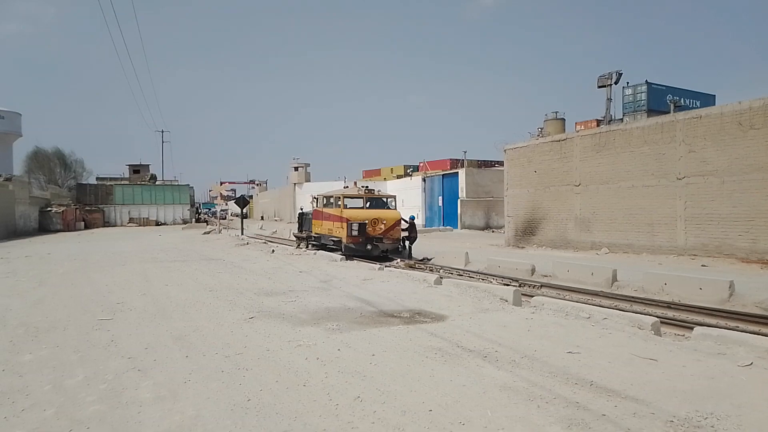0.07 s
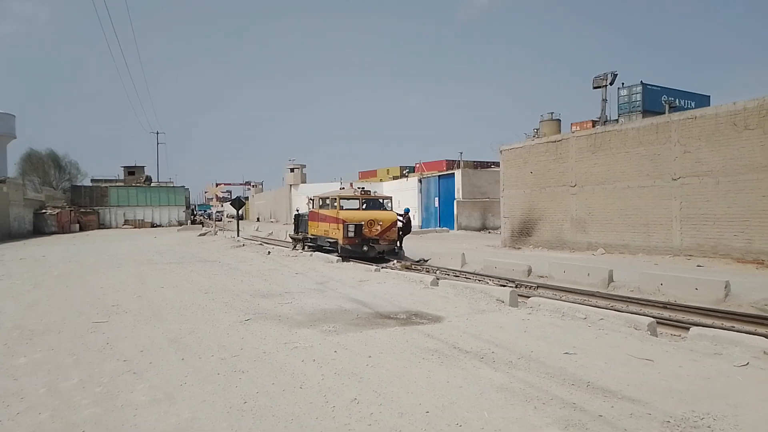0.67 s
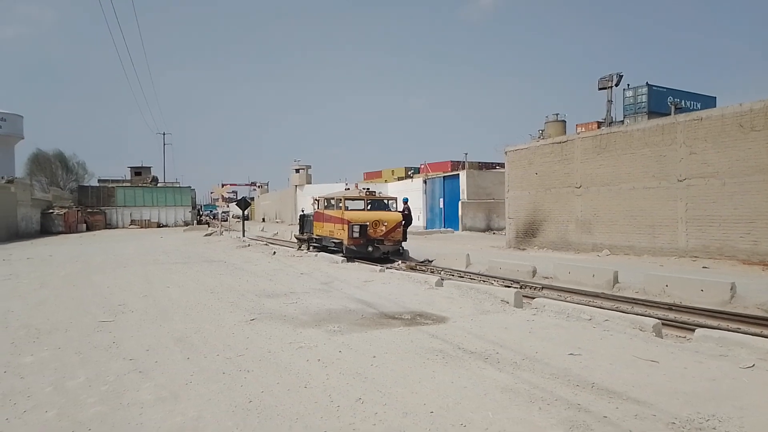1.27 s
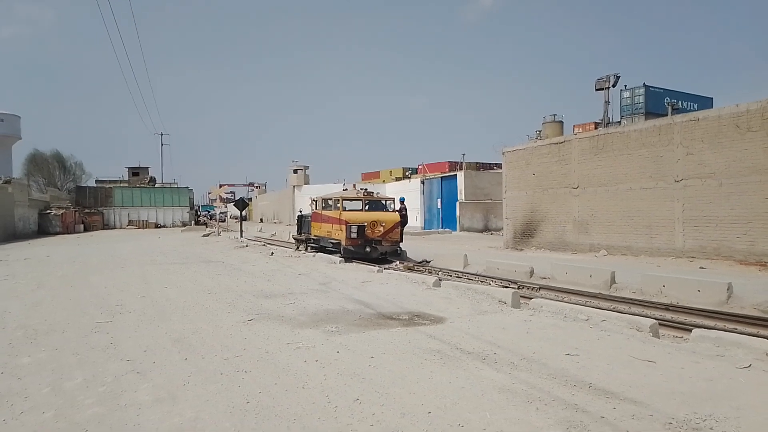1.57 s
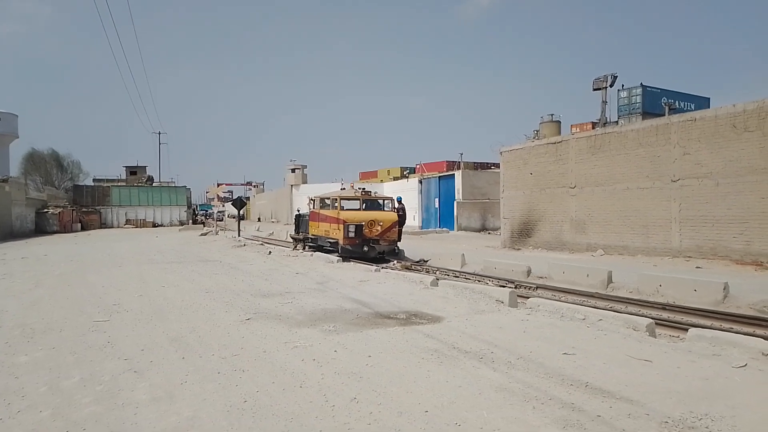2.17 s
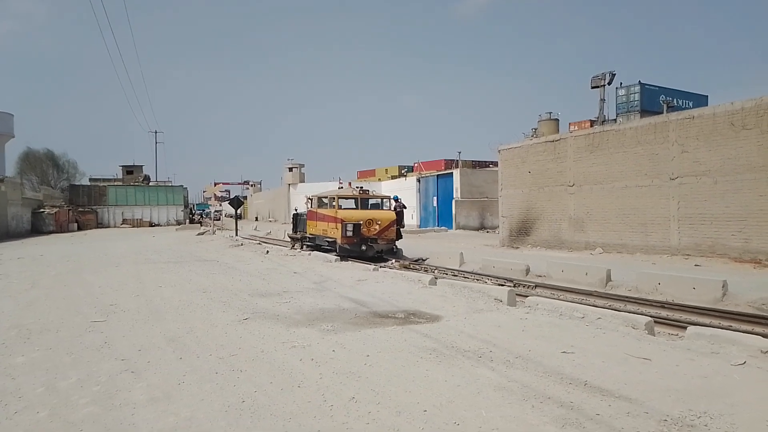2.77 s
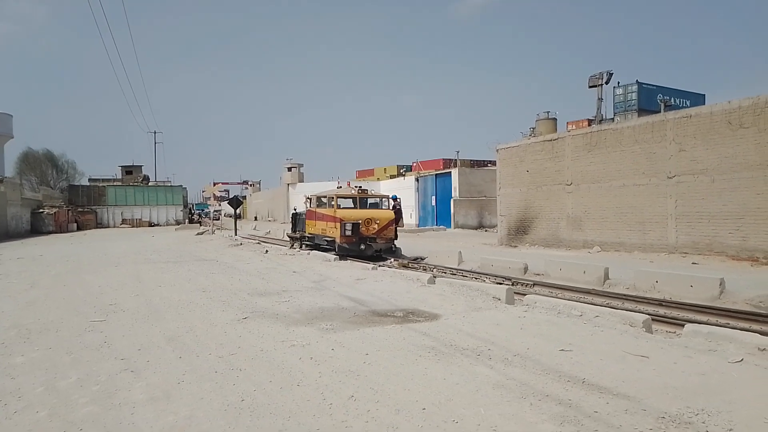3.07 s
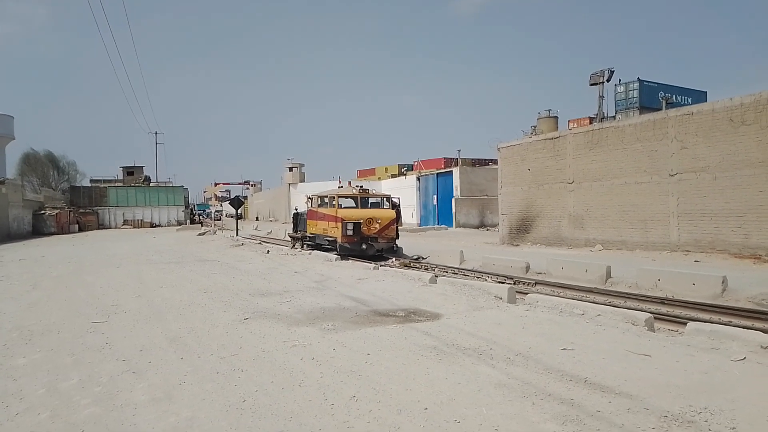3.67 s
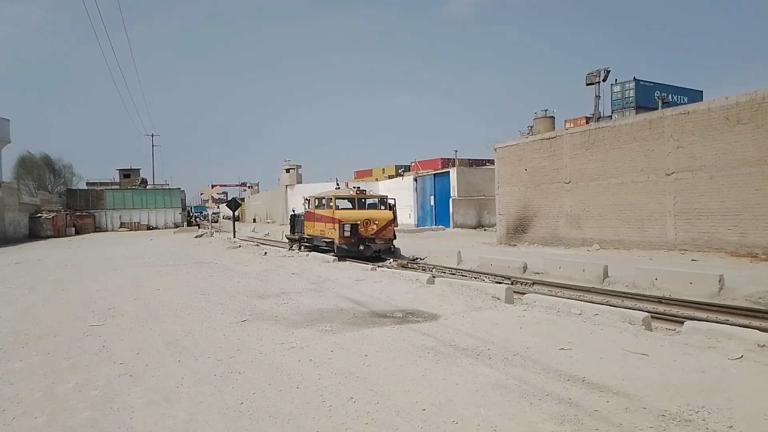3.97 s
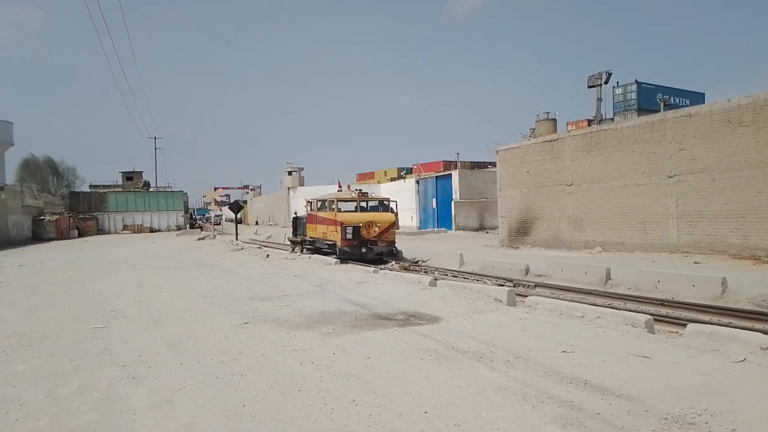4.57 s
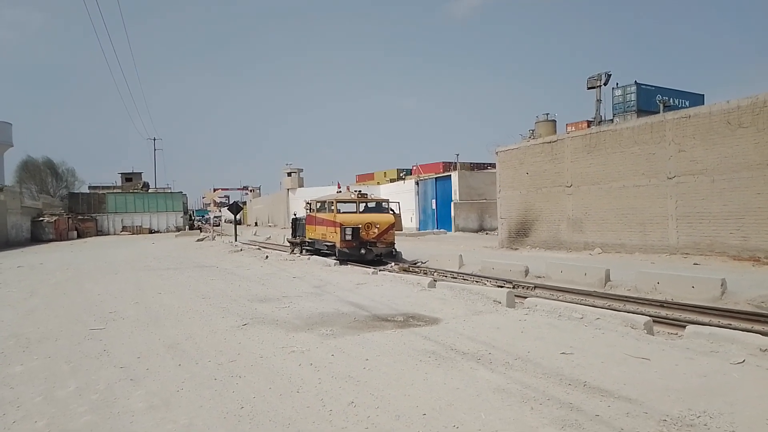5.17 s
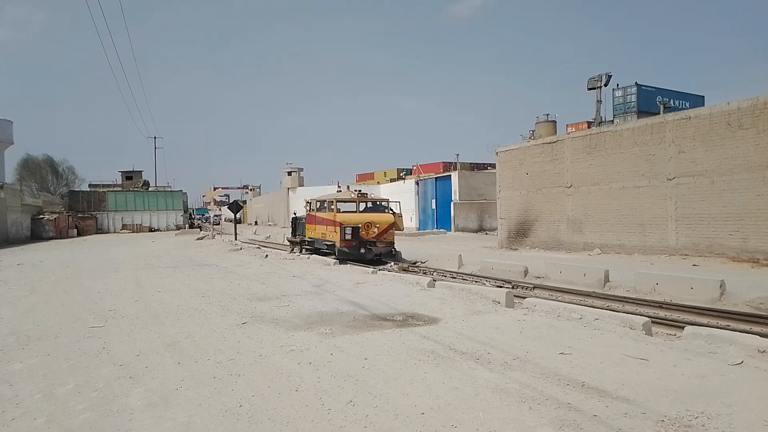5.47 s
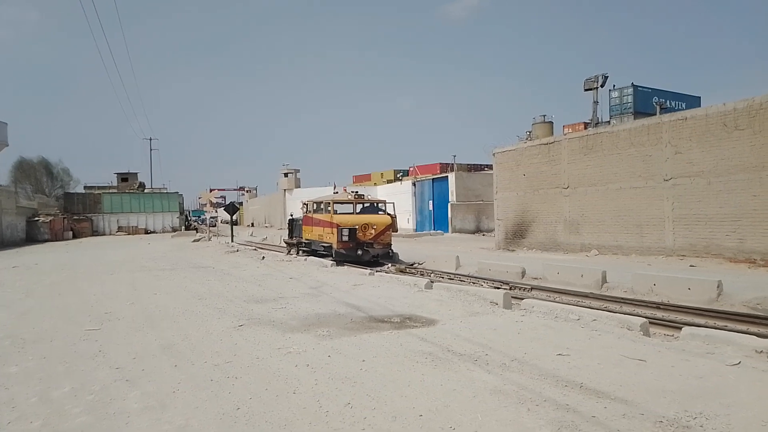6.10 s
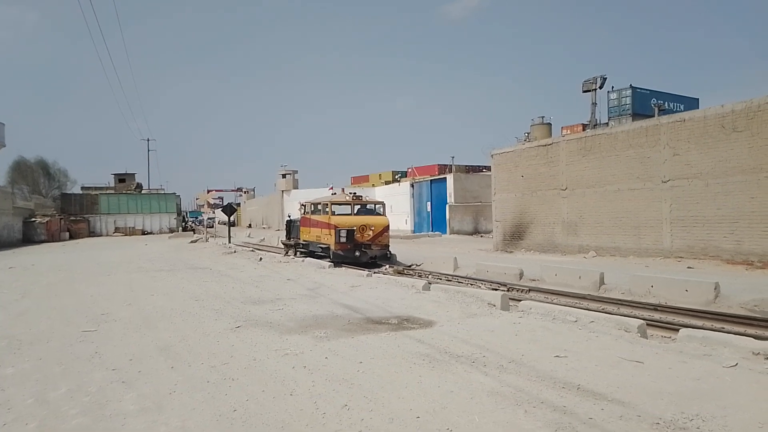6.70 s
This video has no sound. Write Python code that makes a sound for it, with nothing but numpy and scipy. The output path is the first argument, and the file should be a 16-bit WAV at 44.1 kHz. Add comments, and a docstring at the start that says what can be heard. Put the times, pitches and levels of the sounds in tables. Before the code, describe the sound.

A small rail trolley creeps along a yard track at a distance, its diesel idling low and steady beneath gusts of wind that buffet the microphone. Three short bursts of metal come in turn: a ringing coupling with a squeak, a light chain jingle, then knocking brake parts and squeaking wheels. Soft hollow drones, gritty ticks and faint chirps come and go, and the wind drops at the end.

```python
"""Wind rumbles in gusts on the microphone while a diesel ticks over some way off.
The engine belongs to a small rail trolley creeping along a yard track. Impacts set its coupling,
chain and brake rigging ringing, and low, hollow drones swell and fade along with the clanks.
Friction makes the wheels squeak, among ticks of grit and faint chirps. Most of the low rumble
is the fluctuating pressure of turbulent eddies."""
import sys
import numpy as np
from scipy import signal
from scipy.fft import rfft, irfft, next_fast_len
from scipy.io import wavfile
from scipy.ndimage import uniform_filter1d, map_coordinates

SR = 44100
rng = np.random.default_rng(int(sys.argv[2]) if len(sys.argv) > 2 else 0)


def wav_record(signal):
    """Record a signal, one row per channel, as 16-bit PCM in the file named by sys.argv[1]."""
    frames = np.transpose(np.atleast_2d(signal))
    bounded = np.clip(frames, -1, 1)
    # unit amplitude maps onto the largest positive 16-bit level
    quanta = np.round(bounded * 32767).astype(np.int16)
    wavfile.write(sys.argv[1], SR, quanta)


N = 306054


def amp(db):
    """Decibels to amplitude ratio."""
    return 10 ** (np.asarray(db) / 20)


def unit(x):
    """Normalisation to rms 1."""
    return x / np.sqrt(np.mean(x ** 2) + 1e-20)


def clock():
    """Sample times, t/s."""
    return np.arange(N) / SR


def wobble(rate):
    """Smooth random modulation: a spline through rate knots a second."""
    return map_coordinates(rng.standard_normal(int(N * rate / SR) + 4), [clock() * rate])


def filtered(x, response):
    """Linear filtering: the spectrum of x times a frequency response."""
    m = next_fast_len(N + SR // 4)
    return irfft(rfft(x, m) * response(np.fft.rfftfreq(m, 1 / SR)), m)[:N]


def noise(spectrum, drive=1):
    """Source and filter: noise under an envelope, coloured by (f/Hz, level/dB) points; rms 1."""
    f, db = np.transpose(spectrum)
    source = drive * rng.standard_normal(N)
    return unit(filtered(source, lambda hz: amp(np.interp(np.log(hz + 1), np.log(f), db))))


def resonance(centre_hz, width):
    """Random excitation of a cluster of close modes gives narrow-band noise; rms 1."""
    m = next_fast_len(N, real=True)
    detuning = (np.fft.rfftfreq(m, 1 / SR) - centre_hz) / (1.29 * width)
    drive = rng.standard_normal(len(detuning)) + 1j * rng.standard_normal(len(detuning))
    return unit(irfft(drive / (1 + detuning ** 2) ** 2, m)[:N])


def bank(modes):
    """Superposition of resonances (f/Hz, width/Hz, level/dB)."""
    return sum(amp(db) * resonance(hz, width) for hz, width, db in modes)


def even(x, seconds):
    """Division by the running rms removes slow swells."""
    return x / np.sqrt(np.abs(uniform_filter1d(x ** 2, int(seconds * SR))) + 1e-9)


def held(start, length, attack, t60):
    """Linear rise, hold until start + length, then exponential decay; times in s."""
    t = clock() - start
    return np.clip(t / attack, 0, 1) * amp(-60 * np.maximum(t - length, 0) / t60)


def decays(hits, t60):
    """Envelope of incoherent blows (t/s, level/dB): energies add and fall 60 dB in t60 seconds."""
    s, db = np.transpose(hits)
    energy = np.bincount(np.round(s * SR).astype(int), amp(db) ** 2, N)[:N]
    retained = amp(-60 / (t60 * SR)) ** 2
    return np.sqrt(signal.lfilter([1], [1, -retained], energy) + 1e-20)


def engine():
    """Periodic excitation: each firing pushes the exhaust and sets off a burst of clatter."""
    # exhaust harmonics: multiple of the firing rate, level/dB
    harmonics = [(3, -55), (4, -50.5), (5, -54.5), (6, -59)]
    # spectra of exhaust roughness and engine clatter: f/Hz, relative level/dB
    rumble_spectrum = [(20, -25.5), (45, 1.5), (75, 7), (140, 5.5), (220, -13.5), (300, -42), (800, -120)]
    clatter_spectrum = [(590, -26), (1000, -2.5), (1300, -4), (1900, -0.5), (2700, -3.5), (3300, -10),
                        (4200, -16.5), (5500, -18), (7200, -18.5), (8700, -22.5), (10200, -16.5),
                        (11200, -23), (12800, -28), (15500, -40.5)]
    # engine bay resonances: f/Hz, width/Hz, relative level/dB
    bay_modes = [(428.4, 68, -0.5), (648, 110, -5.5), (878, 77, -7.5), (1127, 41, -10), (1400, 74, -23),
                 (1586, 46, -11)]
    firing_hz = 27.35
    cycles = np.cumsum(firing_hz * (1 + 0.0044 * wobble(3))) / SR
    pipe = 0
    for k, db in harmonics:
        pipe += amp(db + 1 + 2.5 * wobble(17)) * np.sin(2 * np.pi * (k * cycles + rng.random()))
    throb = unit(1 + 1.2 * np.exp(-(cycles % 1) / 0.91))
    drift = amp(.5 * wobble(7))
    clatter = amp(-66) * drift * throb * noise(clatter_spectrum)
    bay = amp(-68.5) * throb * unit(bank(bay_modes))
    rumble = amp(-52.5) * noise(rumble_spectrum, throb)
    return pipe + rumble + clatter + bay


def whine():
    """Narrow resonances: engine accessories whine thinly; a louder tone fades in the first second."""
    # accessory tones: f/Hz, width/Hz, level/dB
    tones = [(904, 9.1, -83), (955, 5, -80), (1174, 18, -85.5), (1390, 26, -80.5)]
    fade_db = np.interp(clock(), [0, .5, 1, 1.06], [-70.5, -76.5, -98, -120])
    fading = amp(fade_db) * even(resonance(1146, 1.6), 0.07)
    return bank(tones) + fading


def wind():
    """Turbulence at the microphone: large eddies rumble; stronger wind sheds small, fast ones."""
    # unceasing breeze: t/s, level/dB
    breeze = [(0.0, -38.5), (0.48, -47), (1.41, -41.5), (1.59, -35), (2.3, -39.5), (2.95, -40),
              (3.02, -48.5), (3.56, -34.5), (4.53, -37), (4.86, -42), (5.44, -42.5), (5.65, -49),
              (5.71, -37), (6.3, -45.5), (6.33, -56), (6.94, -53.5)]
    # gusts on top of it: t/s, length/s, large-eddy level/dB, small-eddy level/dB
    gusts = [(0.11, 0.19, -34, -48.5), (0.623, 0.16, -35, -50), (0.83, 0.093, -38.5, -49.5),
             (0.968, 0.064, -29, -42.5), (1.072, 0.26, -30, -36), (1.111, 0.017, -29, -28.5),
             (1.267, 0.014, -20.5, -25), (1.45, 0.093, -28.5, -34.5), (1.507, 0.018, -43, -31),
             (1.603, 0.041, -44, -36), (1.75, 0.28, -33.5, -40), (2.117, 0.1, -33, -52.5),
             (2.476, 0.22, -34, -59.5), (2.797, 0.028, -30, -56.5), (3.25, 0.09, -33.5, -54.5),
             (3.413, 0.016, -33.5, -40), (3.575, 0.318, -31, -38.5), (3.908, 0.057, -31.5, -40),
             (4.015, 0.049, -30, -35), (4.181, 0.073, -32.5, -47.5), (4.308, 0.19, -44, -52),
             (4.934, 0.067, -33.5, -53.5), (5.035, 0.25, -38.5, -67), (5.743, 0.057, -29.0, -47.5),
             (5.783, 0.31, -64, -51)]
    # pressure spectra of large and small eddies: f/Hz, relative level/dB
    large_spectrum = [(20, -36.5), (32, -30), (45, -18), (80, -5), (120, 1.5), (180, -1.5), (235, -10),
                      (290, -21.5), (380, -56), (700, -92)]
    small_spectrum = [(120, -45), (200, 5), (260, 8.5), (360, -1), (450, -14), (560, -20.5), (750, -54),
                      (1200, -82)]
    breeze_db = np.interp(clock(), *np.transpose(breeze))
    small_growth = 4.66  # dB per dB of breeze
    large_power = amp(breeze_db) ** 2
    small_power = amp(-78.5 + small_growth * (breeze_db - breeze_db.mean())) ** 2
    for start, length, large_db, small_db in gusts:
        gust = held(start, length, attack=0.0093, t60=0.19)
        large_power += (amp(large_db) * gust) ** 2
        small_power += (amp(small_db) * gust) ** 2
    lumps = amp(2.42 * wobble(70))
    rumble = np.sqrt(large_power) * even(noise(large_spectrum, lumps), 0.058)
    rumble = filtered(rumble, lambda hz: 1 / (1 + (hz / 275) ** 14))  # large eddies hold nothing faster
    small_eddies = even(noise(small_spectrum, lumps * amp(3.8 * wobble(30))), 0.064)
    flutter = amp(1.5) * np.sqrt(small_power) * small_eddies
    # only the hardest buffets tear off the tiniest eddies
    tearing = small_power / (small_power + amp(-35) ** 2)
    tiny_eddies = unit(amp(3.1 * wobble(120))) * resonance(457, 180)
    return rumble + flutter + amp(-10) * tearing * np.sqrt(small_power) * tiny_eddies


def thumps():
    """An eddy carried past the microphone is one swing of pressure, up and then down."""
    # single eddies: t/s, level/dB, centre f/Hz
    eddies = [(0.227, -20.5, 184), (0.703, -21, 190), (0.835, -15.5, 191), (1.002, -26, 125),
              (1.119, -17.5, 330), (1.125, -11.5, 132), (1.228, -24.5, 392), (1.279, -18, 394),
              (1.284, -9, 148), (1.353, -21, 318), (1.469, -18.5, 187), (1.482, -18.5, 230),
              (1.528, -24, 370), (1.56, -16.5, 230), (1.973, -19.5, 190), (2.814, -25.5, 180),
              (3.255, -22, 133), (3.279, -20.5, 157), (3.421, -20, 218), (3.6, -21, 330),
              (3.631, -19.5, 184), (3.667, -21, 305), (3.755, -21.5, 336), (3.788, -14, 150),
              (3.83, -13, 141), (3.868, -21.5, 355), (3.92, -24.5, 198), (3.979, -26, 200),
              (4.022, -19, 273), (4.042, -23, 287), (4.214, -27, 170), (4.241, -24.5, 140), (4.9, -24, 148),
              (4.963, -28, 182), (5.126, -26, 141), (5.26, -21, 130), (5.752, -15.5, 144),
              (6.499, -32.5, 120)]
    out = np.zeros(N)
    for s, db, hz in eddies:
        phase = 2 * np.pi * hz * (clock() - s)
        out -= amp(db) * np.sin(phase) * np.exp(-(phase / 4.16) ** 2)
    return out


def drones():
    """Narrow-band noise: low, hollow drones, each at its own pitch, swell and fade with the clanks."""
    # hollow drones: t/s, length/s, f/Hz, width/Hz, level/dB
    swells = [(1.07, 0.95, 482, 130, -51.5), (1.273, 0.1, 860, 190, -57.5), (1.47, 0.27, 850, 170, -56),
              (1.103, .09, 966, 90, -61.5), (3.42, 0.16, 514, 94, -56.5), (3.57, .63, 464, 190, -50.5),
              (3.59, 0.88, 652, 116, -59.5), (3.62, 0.62, 948, 53, -61.5), (3.4, 0.39, 380, 120, -62),
              (5.78, 0.302, 418, 59, -53), (5.767, 0.32, 606, 90, -65), (5.757, 0.19, 933, 68, -62)]
    crest, sag_db = 0.49, 6  # loudest point as a share of the length; drop half a length from it
    out = 0
    for s, length, hz, width, db in swells:
        off_crest = (2 * ((clock() - s) / length - crest)) ** 2
        drone = even(resonance(hz, width), .1)
        out += held(s, length, attack=0.015, t60=0.09) * amp(db - sag_db * off_crest) * drone
    flicker = unit(amp(1.8 * wobble(45)))
    return flicker * out


def ironwork(hits, modes, crack_db, crack_t60, clash_db, clash_t60, ring_db):
    """Impact excitation: a broadband crack, a dense clash around every mode, then its damped ring."""
    # contact spectrum: f/Hz, relative level/dB
    crack_spectrum = [(1000, -0.5), (3000, 3.5), (4500, -7), (6000, -6.5), (7000, -8), (9000, -10.5),
                      (11000, -5), (12500, -9), (13500, -17.5), (15500, -24)]
    s, level, tilt = np.transpose(hits)  # harder contacts tilt towards the treble
    out = amp(crack_db) * decays(np.c_[s, level + tilt / 2], crack_t60) * noise(crack_spectrum)
    lag = np.exp(-1 / (0.0028 * SR))  # the ring takes a moment to spread through the steel
    for hz, width, db, t60 in modes:
        blows = np.c_[s, level + db + tilt * np.log2(hz / 5000) + rng.normal(0, 1, len(s))]
        ring = signal.lfilter([1 - lag], [1, -lag], decays(blows, t60))
        out += amp(ring_db) * ring * resonance(hz, width)
        out += amp(clash_db) * decays(blows, clash_t60) * resonance(hz, 2 * width + 100)
    return out * amp(1.5 * wobble(130))  # loose parts chatter


def coupling():
    """The loose coupling clanks and rings on in free vibration."""
    # contacts: t/s, level/dB, tilt/(dB per octave)
    hits = [(1.15, -68.5, -3), (1.299, -65, -4), (1.345, -69, 0), (1.485, -55.5, 5), (1.517, -51, 2),
            (1.527, -57.5, 1), (1.538, -55, -0.5), (1.556, -52, 0.5), (1.58, -59.5, -1),
            (1.592, -58.5, 5.5), (1.605, -60, 1), (1.622, -60, -3), (1.635, -55.5, 6), (1.668, -68, -2),
            (1.701, -52.5, -3.5), (1.711, -64, -3.5), (1.81, -67, -10)]
    # coupling modes: f/Hz, width/Hz, level/dB, t60/s
    modes = [(1900, 51, -23, 1.2), (2050, 45, -14, 1.2), (2325, 64, -4.5, 0.94), (2700, 50, -17.5, 0.74),
             (2970, 75, -8.5, 0.85), (3335, 46, -8.5, 1.7), (3600, 45, -5.5, 0.87), (3690, 45, -6, 0.85),
             (3800, 50, -10, 0.93), (3985, 70, -7, 1.05), (4480, 90, -22, .25), (5080, 80, -9.5, 0.41),
             (5370, 80, -15, 0.3), (6670, 150, -11.5, 0.33), (7030, 110, -13.5, 0.31),
             (7400, 60, -14, 0.22), (8100, 130, -8.5, 0.24), (8480, 110, -18, .25), (9000, 80, -17.5, .2),
             (9730, 70, -14, 0.5), (9810, 80, -10.5, 0.33), (10250, 60, -8.5, 0.36),
             (10580, 40, -14.5, 0.7), (10900, 160, -14, 0.3)]
    return ironwork(hits, modes, crack_db=-9.5, crack_t60=.1, clash_db=-3, clash_t60=.14, ring_db=-10)


def squeaks():
    """Friction excitation: a flange catches the rail and one wheel mode swells, then rings out."""
    # wheel modes: name -> f/Hz, width/Hz
    modes = {"low": (1866, 52), "middle": (2345, 55), "high": (3348, 52), "keen": (5992, 70),
             "shrill": (3820, 85), "glassy": (9550, 90), "whistle": (10780, 170), "thin": (10400, 80)}
    # flange catches: peak t/s, mode name, level/dB, rise/s
    catches = [(1.385, "middle", -62.5, 0.071), (1.53, "middle", -54.5, 0.04), (1.63, "middle", -62, 0.035),
               (1.708, "middle", -57, 0.036), (1.97, "middle", -62, 0.13), (3.91, "glassy", -78.5, 0.06),
               (4.05, "shrill", -80, 0.44), (5.68, "thin", -76, 0.018), (5.8, "whistle", -70.5, .03),
               (5.8, "high", -65, 0.058), (5.82, "shrill", -67.5, 0.045), (6.004, "high", -59, 0.067),
               (6.05, "low", -66.5, 0.16), (6.165, "low", -52, 0.022), (6.235, "low", -58.5, 0.037),
               (6.33, "low", -68, .03), (6.04, "whistle", -70, 0.085), (6.16, "whistle", -72.5, 0.086),
               (6.18, "thin", -77, .1), (6.03, "keen", -77.5, .07)]
    ring_t60, rub_start_s = 0.53, 5.93
    # a dry rub of wheel on rail sets in and stays
    out = amp(-74) * np.clip((clock() - rub_start_s) / 0.046, 0, 1) * resonance(1420, 270)
    energy = {mode: np.zeros(N) for mode in modes}
    for s, mode, db, rise in catches:
        t = clock() - s
        swell = np.exp(-(np.minimum(t, 0) / rise) ** 2)
        decay = amp(-60 * np.maximum(t, 0) / ring_t60)
        energy[mode] += (amp(db) * swell * decay) ** 2
    for mode, (hz, width) in modes.items():
        out += np.sqrt(energy[mode]) * even(resonance(hz, width), .05)
    return out * amp(3.4 * wobble(50))


def grit():
    """Brief contacts radiate broadband noise: dull scuffs, sharp clicks and a faint random scatter."""
    # ticks of grit: t/s, level/dB, sharpness (0-1)
    ticks = [(1.889, -61, .1), (1.931, -59.5, .7), (2.069, -68, .9), (2.25, -61, 0.2), (2.289, -58.5, 0.9),
             (2.393, -61, .1), (2.437, -62, 0.7), (2.729, -60.5, .9), (2.79, -64, .5), (2.829, -60.5, .6),
             (3.021, -64, .9), (3.127, -60, .1), (3.172, -56, 1), (4.01, -62.5, .2), (4.049, -61, .8),
             (4.267, -62, .5), (4.375, -60, 0), (4.417, -59, .8), (4.597, -60.5, .1), (4.635, -60, .8),
             (4.703, -61, 0.7), (4.919, -62, .5), (5.191, -55, 0.7), (5.221, -53.5, 0.8), (5.4, -61.5, .4),
             (6.802, -55.5, 0.4), (6.838, -59.5, .3), (6.876, -60, .7)]
    # spectra of dull and sharp contacts: f/Hz, relative level/dB
    scuff_spectrum = [(1500, -1), (3000, 10), (4500, -3), (6500, 0), (9000, -1), (11000, 0), (13000, -13),
                      (15500, -18)]
    click_spectrum = [(1500, -7), (3000, 0), (4500, -3), (6000, -9), (9000, 0.5), (11000, 4.5),
                      (12500, -6.5), (15500, -14)]
    s, db, sharp = np.transpose(ticks)
    sharp = np.clip(sharp, 0.001, 0.999)
    scuffs = amp(-8.5) * decays(np.c_[s, db + 10 * np.log10(1 - sharp)], t60=0.24)
    scuffs = uniform_filter1d(scuffs, size=260)  # a scuff has no sharp edge
    clicks = amp(-6.5) * decays(np.c_[s, db + 10 * np.log10(sharp)], t60=0.055)
    when, strength = rng.random((45, 2)).T
    faint = decays(np.c_[when * (N - 1) / SR, -82 + 8 * strength], t60=0.042)
    grain = amp(3.2 * wobble(350))  # each tick is a few tiny contacts
    return grain * (scuffs * noise(scuff_spectrum) + (clicks + faint) * noise(click_spectrum))


def chirps():
    """Random frequency and amplitude modulation make short, faint tones sound broken."""
    # chirps: peak t/s, f/Hz, level/dB, half-length/s, glide/(Hz per s)
    tones = [(2.52, 4600, -76, .012, 0), (2.56, 4600, -76, .018, 0), (3.175, 4550, -75, .01, 0),
             (3.395, 4600, -79, .013, -2), (4.412, 4530, -75, .013, -2), (4.59, 4440, -79, 0.06, -3),
             (5.25, 11000, -75, 0.073, -3), (6.49, 1900, -65, 0.04, -2000),
             (6.677, 1760, -63.5, 0.086, -1200)]
    out = np.zeros(N)
    for s, hz, db, half_length, glide in tones:
        near = np.abs(clock() - s) < .2
        t = clock()[near] - s
        waver = uniform_filter1d(rng.standard_normal(len(t)), size=60)
        phase = 2 * np.pi * np.cumsum(hz + glide * t + 900 * waver) / SR
        out[near] += amp(db) * np.exp(-(t / half_length) ** 2) * np.sin(phase)
    return out * amp(3.4 * wobble(80))


def chain():
    """Links run together, and the collisions excite their high modes in a jingle."""
    # collisions: t/s, level/dB, tilt/(dB per octave)
    hits = [(3.415, -68, 3.5), (3.445, -58.5, -2), (3.470, -62, 6.5), (3.486, -60, 6.5), (3.5, -64.5, 3),
            (3.52, -62, 0), (3.56, -63.5, -0.5)]
    # link modes: f/Hz, width/Hz, level/dB, t60/s
    modes = [(1400, 230, -7.5, 0.91), (1910, 110, -1, 0.48), (2800, 120, -8, 1.1), (3160, 180, -7.5, 1.9),
             (4040, 80, -14, 0.71), (7570, 110, -8.5, 0.93), (7950, 230, -7, 0.4), (8732, 100, -7.5, 0.63),
             (9050, 130, -12, .5), (9572, 150, -6.5, 0.81), (9830, 150, -6, 0.33), (10100, 150, -2.5, 0.35),
             (10700, 170, -10, .3), (11000, 110, -7, 0.55), (11260, 100, -11.5, 0.97),
             (11750, 130, -17, .4), (12270, 130, -18, .3)]
    return ironwork(hits, modes, crack_db=-4.5, crack_t60=.3, clash_db=-9.5, clash_t60=.33, ring_db=-9)


def brake_rigging():
    """The brake rigging knocks and rings at its natural frequencies."""
    # knocks: t/s, level/dB, tilt/(dB per octave)
    hits = [(5.639, -59.5, 0), (5.669, -61, 5), (5.702, -60.5, 1.5), (5.747, -62, -1.5), (5.777, -62, 0),
            (5.812, -67, -6), (5.965, -60, -3.5), (6.0, -60, -0.5), (6.04, -64.5, -1)]
    # rigging modes: f/Hz, width/Hz, level/dB, t60/s
    modes = [(954, 41, -7.5, 0.71), (1850, 280, -2.5, 0.87), (2780, 100, -1, 0.37), (3920, 64, -15, 0.8),
             (4495, 50, -19, .6), (8920, 60, -18, 0.45), (4970, 80, -12, 0.56), (5300, 70, -15, .5),
             (9720, 100, -14, 0.68), (10400, 130, -7, 0.45), (10900, 290, -3.5, 0.36),
             (11500, 280, -10, 0.23), (12250, 120, -18, .3)]
    return ironwork(hits, modes, crack_db=-.5, crack_t60=.22, clash_db=-7.5, clash_t60=.15, ring_db=-7)


def scene():
    """Superposition of the yard's sounds and the wind at the microphone, in one channel."""
    clanks = coupling() + chain() + brake_rigging()
    yard = clanks + engine() + whine() + drones() + squeaks() + chirps() + grit()
    return (yard + wind() + thumps())[None]


def record(dry):
    """Band limiting: an ideal low-pass filter removes the highest treble."""
    cutoff_hz = 15700
    return filtered(dry[0], lambda hz: hz < cutoff_hz)[None]


dry = scene()
out = record(dry)
wav_record(out)
```